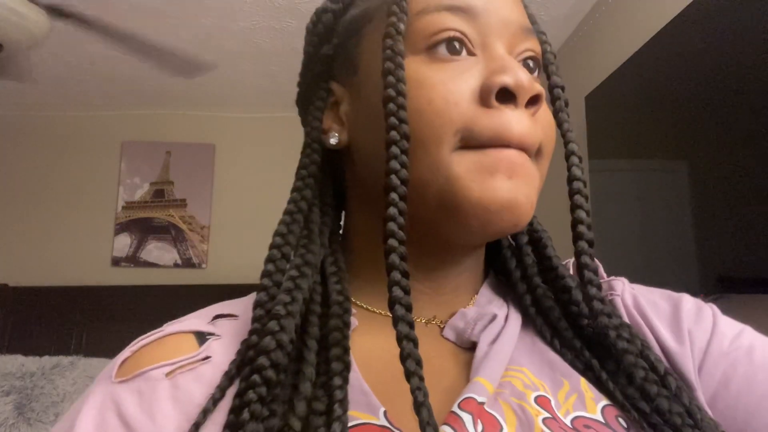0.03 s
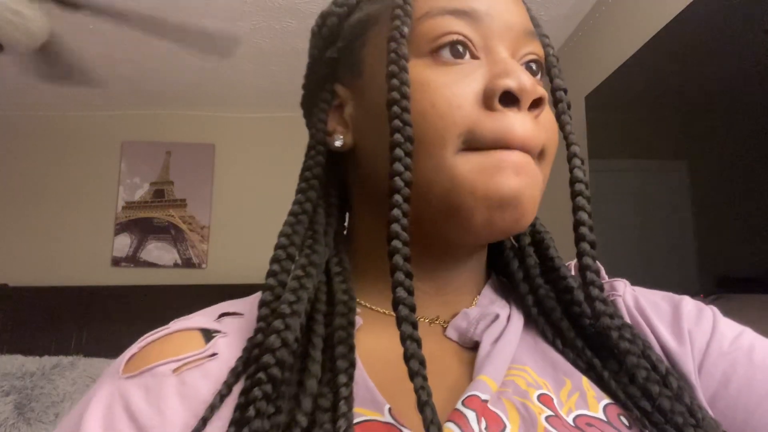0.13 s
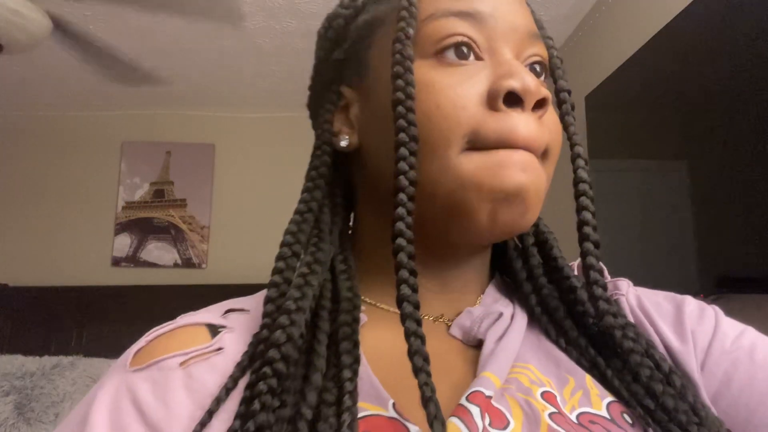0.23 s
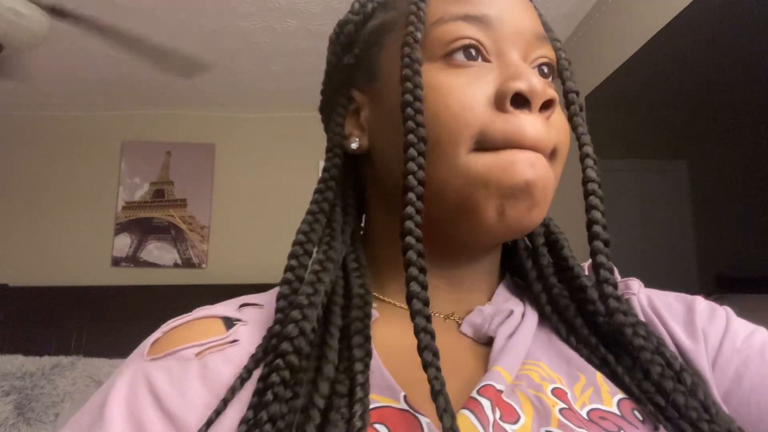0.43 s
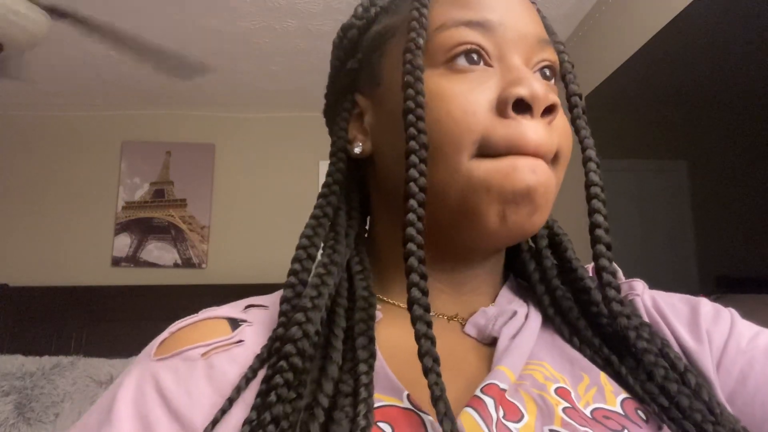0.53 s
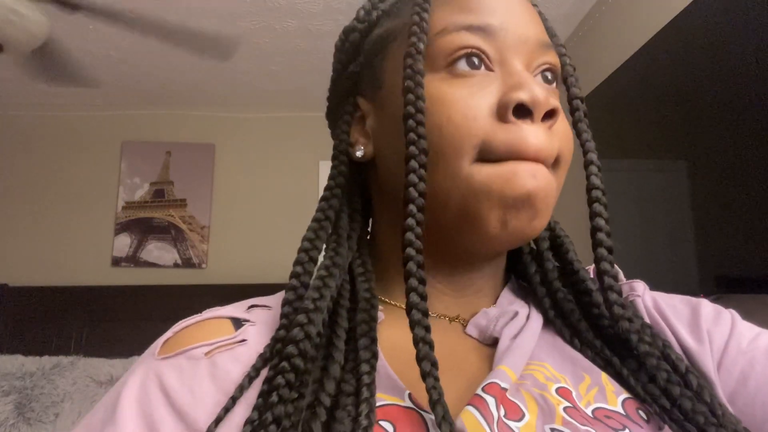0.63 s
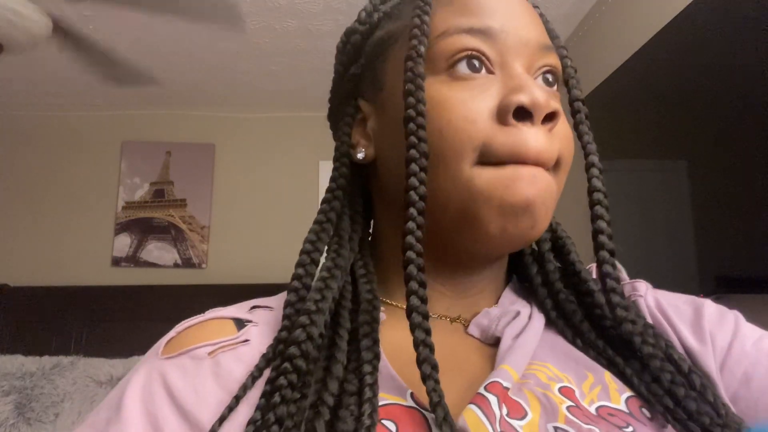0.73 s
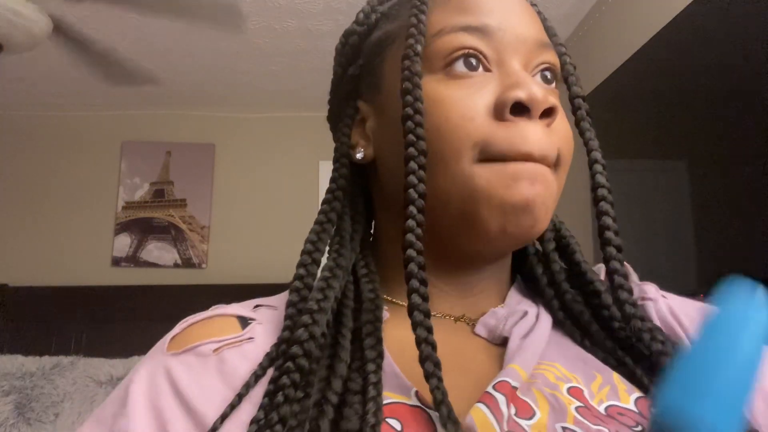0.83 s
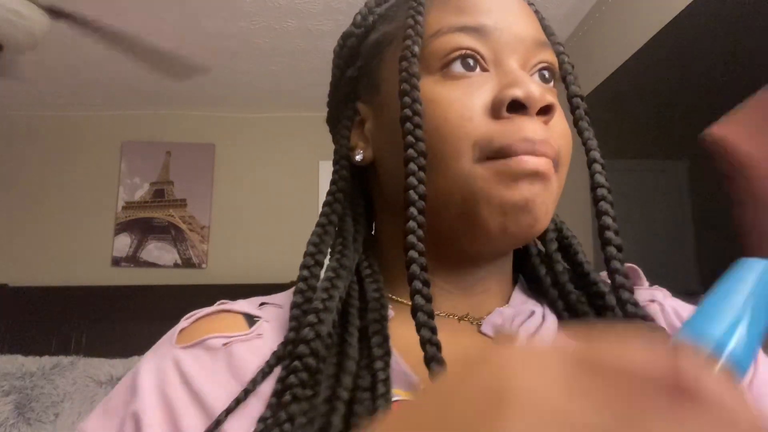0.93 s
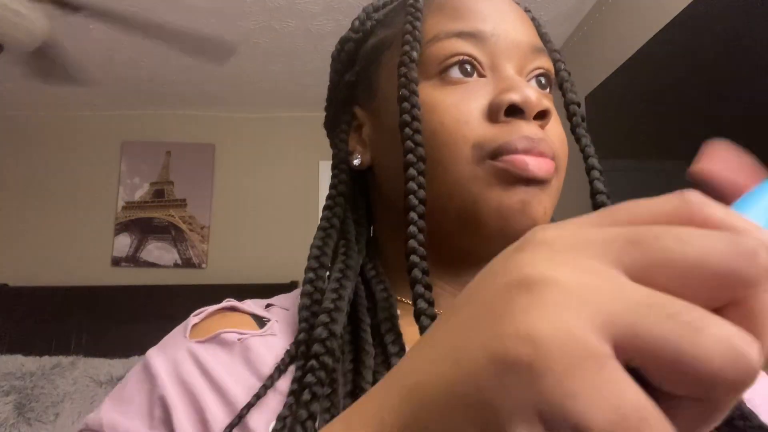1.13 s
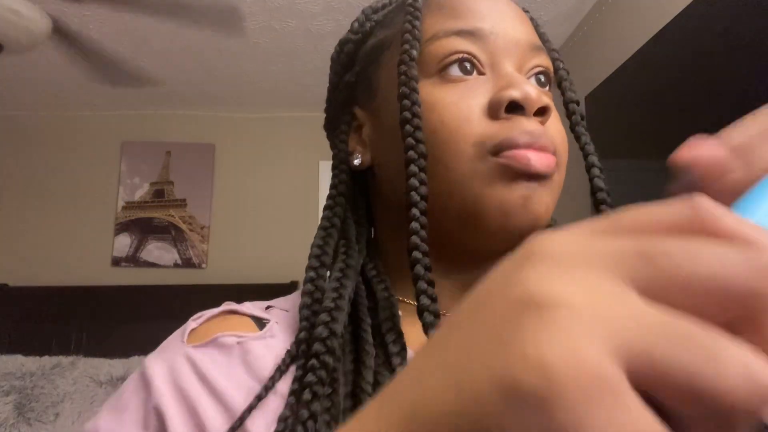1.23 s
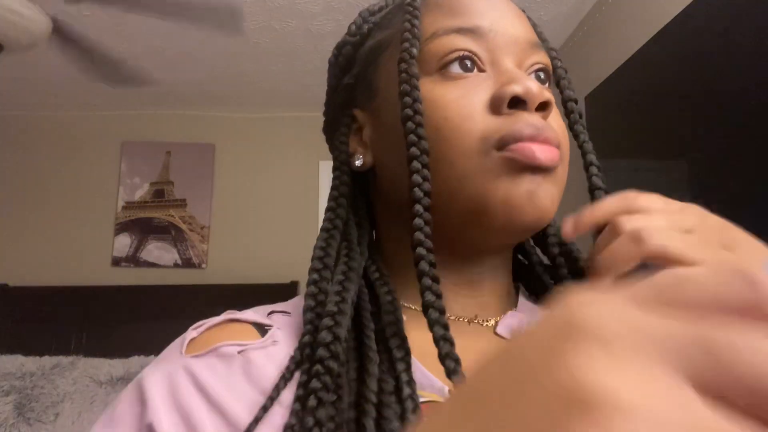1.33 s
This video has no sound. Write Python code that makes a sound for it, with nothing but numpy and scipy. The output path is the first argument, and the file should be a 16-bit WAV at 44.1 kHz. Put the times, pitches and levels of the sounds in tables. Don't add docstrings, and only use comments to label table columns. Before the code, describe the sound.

A small hard plastic tube knocks twice on a hollow desk with a tiny bounce between, each crack followed by woody body and low boom; then faint finger ticks and rubs, close microphone, quiet humming bedroom.

```python
import sys
import numpy as np
from scipy import signal
from scipy.fft import rfft, irfft, next_fast_len
from scipy.io import wavfile
from scipy.ndimage import uniform_filter1d, map_coordinates

SR = 44100
rng = np.random.default_rng(int(sys.argv[2]) if len(sys.argv) > 2 else 0)


def makeup_ratio(level_db):
    decades = np.asarray(level_db, float) / 20
    return 10 ** decades


def to_wav(sig):
    pcm = np.clip(np.atleast_2d(sig), -1, 1) * 32767
    pcm = np.round(pcm).astype(np.int16)
    wavfile.write(sys.argv[1], SR, pcm.T)


N = 61739


def unit(x):
    return x / np.sqrt(np.mean(x ** 2) + 1e-20)


def along(points, hz):
    point_hz, value = np.transpose(points)
    return np.interp(np.log(hz + 1), np.log(point_hz + 1), value)


def curve(rows):
    return np.interp(np.arange(N) / SR, *np.transpose(rows))


def wobble(knots_per_s):
    knots = rng.standard_normal(int(N * knots_per_s / SR) + 4)
    return map_coordinates(knots, [np.arange(N) * knots_per_s / SR])


def filtered(x, response):
    n = x.shape[-1]
    size = next_fast_len(n + 8192)
    spectrum = rfft(x, size) * response(np.fft.rfftfreq(size, 1 / SR))
    return irfft(spectrum, size)[..., :n]


def add(track, start_s, sound):
    part = track[round(start_s * SR):][:len(sound)]
    part += sound[:len(part)]


def ring(modes, rise_s, scatter_db, rough_rad):
    t = np.arange(SR // 2) / SR
    out = np.zeros(len(t))
    for k, (freq_hz, level_db, t60_s) in enumerate(modes):
        envelope = makeup_ratio(level_db + scatter_db * rng.standard_normal() - 60 * t / t60_s)
        jitter = rough_rad * wobble(128)[:len(t)] * np.minimum(t / 0.012, 1)
        out += (-1) ** k * envelope * np.sin(2 * np.pi * freq_hz * t + jitter)
    return out * (1 - np.exp(-(t / rise_s) ** 2))


def burst(colour, rise_s, t60_s):
    t = np.arange(SR // 10) / SR
    noise = unit(filtered(rng.standard_normal(len(t)), colour))
    return noise * (1 - np.exp(-(t / rise_s) ** 2)) * makeup_ratio(-60 * t / t60_s)


def rush(spectrum, alike, patchy_db):
    z = signal.stft(rng.standard_normal((2, N)), nperseg=512)[2]
    patches = uniform_filter1d(rng.standard_normal(z.shape[1:]), size=6, axis=0)
    patches = uniform_filter1d(patches, size=10, axis=1)
    pair = signal.istft(z * makeup_ratio(patchy_db * unit(patches)), nperseg=512)[1][:, :N]

    def mid_side(hz):
        turn = np.arccos(np.clip(along(alike, hz), -1, 1)) / 2
        return makeup_ratio(along(spectrum, hz)) * [np.cos(turn), np.sin(turn)]

    mid, side = filtered(pair, mid_side)
    return unit(np.array([mid + side, mid - side]))


# freq_hz, level_db
HUM_SPECTRUM = [(20, -37.5), (33, -15), (45, -2.5), (70, -5.5), (107, 3), (129, -1), (145, -12.5),
                (194, -10.5), (330, -15.5), (430, -57)]
# freq_hz, level_db
AIR_SPECTRUM = [(150, -42), (250, -15.5), (457, -1), (600, -10.5), (1100, -14), (1500, -27.5), (4500, -41),
                (9400, -46.5), (10000, -69)]
# time_s, level_db
AIR_STIR = [(0, -5), (.15, 0), (.5, -1), (.9, 1), (1.1, -2), (1.27, -1.5), (1.33, 4.5), (1.4, -3)]
# freq_hz, level_db
HISS_SPECTRUM = [(10600, -37), (11200, -4), (13600, 8), (14200, -35)]
# freq_hz, correlation
LIKENESS = [(60, 0.85), (180, 0.74), (550, -0.39), (1650, -0.17), (4970, 0.27), (15000, -1.6)]


def background():
    hum_db, air_db, hiss_db = -52.5, -63.5, -98
    hum = makeup_ratio(hum_db + 0.41 * wobble(6.5)) * rush(HUM_SPECTRUM, LIKENESS, patchy_db=0.77)
    air = makeup_ratio(air_db + curve(AIR_STIR)) * rush(AIR_SPECTRUM, LIKENESS, patchy_db=1.0)
    hiss_band = [(9000, -120)] + HISS_SPECTRUM + [(16000, -120)]
    hiss = makeup_ratio(hiss_db) * rush(hiss_band, [(3000, 0.2)], patchy_db=3.2)
    return (hum + air + hiss) * makeup_ratio([[-1.2], [1.2]])


# freq_hz, t60_s
ROOM_DECAY = [(150, 0.3), (500, 0.18), (2000, 0.3), (5000, 0.22), (12000, 0.13)]
# freq_hz, level_db
ROOM_TINT = [(100, -13.5), (600, 0), (1500, 4.5), (3000, 0), (6000, -5), (12000, 1)]


def room(x):
    out = np.zeros((2, N))
    stretch = SR // 11
    for start in range(0, N, stretch):
        hz, t, z = signal.stft(rng.standard_normal((2, SR // 2)), SR, nperseg=256)
        decay_db = along(ROOM_TINT, hz)[:, None] - 60 * t / along(ROOM_DECAY, hz)[:, None]
        tail = signal.istft(z * makeup_ratio(decay_db), SR, nperseg=256)[1]
        tail = tail / np.linalg.norm(tail[0])
        wet = signal.fftconvolve(x[None, start:start + stretch], tail, axes=1)
        for c in range(2):
            add(out[c], start / SR + 0.004, wet[c])
    return out


# freq_hz, left_minus_right_db
PORT_TILT = [(60, -1), (130, -8.5), (290, 5), (640, -11.5), (1410, -2), (3100, -5.5), (6820, -5),
             (15000, 3.5)]
# freq_hz, left_lead_rad
PORT_LEAD = [(0, 0), (140, -1), (300, -1.82), (600, -1.5), (1120, -2.5), (1720, 0.5), (3360, -11.5),
             (4220, -5), (6500, -3.5), (7670, -11), (12400, -18.5), (15200, -16)]


def ports(x):
    side = np.array([[0.5], [-0.5]])

    def response(hz):
        lead_rad = np.interp(hz, *np.transpose(PORT_LEAD))
        return makeup_ratio(side * along(PORT_TILT, hz)) * np.exp(1j * side * lead_rad)

    return filtered(x, response)


# time_s, level_db
SLIDE_DRAG = [(.5, -86), (.62, -92), (.72, -83.5), (.76, -81.5), (.93, -70), (.98, -88)]
# freq_hz, width_hz, level_db
SLIDE_RESONANCES = [(2620, 390, 0), (1860, 2600, 4), (4660, 620, -6)]


def finger_slide():
    def tube(hz):
        total = 0
        for peak_hz, width_hz, level_db in SLIDE_RESONANCES:
            damping = 1j * hz * width_hz
            total = total + makeup_ratio(level_db) * damping / (peak_hz ** 2 - hz ** 2 + damping)
        return total ** 2

    silent_until_s = SLIDE_DRAG[0][0] - 0.1
    drag_db = curve([(0, -120), (silent_until_s, -120)] + SLIDE_DRAG + [(1.1, -120)])
    return unit(filtered(rng.standard_normal(N), tube)) * makeup_ratio(drag_db)


# freq_hz, level_db
SKIN_COLOUR = [(900, -36), (2000, -9), (7300, -6.5), (9400, -8), (10000, -26), (10900, -35), (11400, -11),
               (13600, -19), (14400, -25), (15600, -35)]
# time_s, level_db
RUB_PRESSURE = [(0, -98), (.18, -83), (.3, -93), (.55, -88), (.62, -81.5), (.7, -87), (.78, -84),
                (.85, -86), (.94, -83), (.99, -69), (1.025, -72), (1.07, -76), (1.12, -85), (1.25, -83),
                (1.4, -87.5)]


def finger_rub():
    return rush(SKIN_COLOUR, [(3000, 0.3)], patchy_db=2.5) * makeup_ratio(curve(RUB_PRESSURE) + 0.41 * wobble(140))


# start_s, level_db, brightness_db_per_octave
FINGER_TICKS = [(.616, -57, -8.5), (0.664, -65, -6), (0.7123, -57, -9.5), (0.9612, -56.5, -5.5),
                (0.9889, -52, 5), (1.017, -55, 18), (1.034, -62, 9), (1.25, -64, 8), (1.316, -77, -6)]


def finger_ticks():
    out = np.zeros(N)
    for start_s, level_db, bright_db in FINGER_TICKS:
        def colour(hz):
            return makeup_ratio(along(SKIN_COLOUR, hz) + bright_db * np.log2(hz / 5000 + 0.0058))
        add(out, start_s, makeup_ratio(level_db) * burst(colour, rise_s=0.00066, t60_s=0.013))
    return out


# start_s, level_db, pitch_hz, t60_s
HAND_PUSHES = [(.148, -38.5, 170, 0.16), (.272, -36.5, 90, 0.39), (0.23, -44, 53, 0.23),
               (0.34, -52.5, 230, .12), (.325, -47, 186, 0.13), (0.15, -60, 960, 0.24)]


def hand_pushes():
    out = np.zeros(N)
    for start_s, level_db, pitch_hz, t60_s in HAND_PUSHES:
        add(out, start_s, ring([(pitch_hz, level_db, t60_s)], 0.0088, scatter_db=1.5, rough_rad=0.15))
    return out


# start_s, crack_db, body_db, ring_db, desk_db
KNOCK_EVENTS = [
    (0.2055, -26, -23.5, -41, -26.5),
    (0.2881, -39, -57.5, -55.5, -79),
    (0.3895, -27.5, -24.5, -42.5, -31.5),
]
# first_body_mode_db, fifth_body_mode_db
KNOCK_BODY_TILT = [(-1.5, 4), (-7, 30.5), (-0.5, 4)]
# freq_hz, level_db
CRACK_COLOUR = [(600, -17), (1200, -13), (2200, -5.5), (3200, -9), (5000, -6.5), (8500, -11),
                (10500, -38.5), (12000, -20.5), (13500, -28), (14800, -40), (15600, -49)]
# freq_hz, level_db, t60_s
TUBE_MODES = [(2040, 4, 0.018), (2470, -7, 0.023), (3660, -33, 0.077), (4260, -1.5, 0.035),
              (4700, -25, 0.018), (6630, 3, 0.041), (7570, -10, 0.045), (8350, -26, 0.069),
              (14700, -40, 0.045)]
SING_MODE_HZ = [2790, 5445, 8400, 12050, 14530]
# level_db, t60_s
SING_MODE_DECAY = [(5.5, 0.043), (2.5, 0.12), (-20.5, 0.23), (-30, 0.056), (-16, .17)]
# freq_hz, level_db, t60_s
BODY_MODES = [(543, -2.5, 0.11), (647.7, -3.5, 0.076), (792.4, -5.5, 0.059), (947, -19.5, 0.043),
              (1109, -10, 0.038), (1397, -17.5, 0.057), (295.7, -22, 0.19), (372, -28, 0.19),
              (689, -7.5, 0.063)]
# freq_hz, level_db, t60_s
DESK_MODES = [(142.5, 5.5, 0.091), (192.6, -13.5, 0.23), (94, -1, 0.033)]


def knocks():
    scrape_lead_s, scrape_db = 0.014, -34
    body_lag_s, desk_lag_s = 0.0012, 0.0082
    sing_modes = [(hz, *decay) for hz, decay in zip(SING_MODE_HZ, SING_MODE_DECAY)]

    def crack_colour(hz):
        return makeup_ratio(along(CRACK_COLOUR, hz))

    out = np.zeros(N)
    for event, (first_db, fifth_db) in zip(KNOCK_EVENTS, KNOCK_BODY_TILT):
        start_s, crack_db, body_db, ring_db, desk_db = event
        tilt_db = {0: first_db, 4: fifth_db}
        body_modes = [(hz, db + tilt_db.get(k, 0), t60_s) for k, (hz, db, t60_s) in enumerate(BODY_MODES)]

        scrape = burst(crack_colour, rise_s=0.0014, t60_s=0.46)
        crack = burst(crack_colour, rise_s=0.0013, t60_s=0.025)
        tube = ring(TUBE_MODES, 0.0015, scatter_db=2, rough_rad=0.6)
        sing = ring(sing_modes, 0.0013, scatter_db=-1.2, rough_rad=0.55)
        body = ring(body_modes, 0.0015, scatter_db=1.2, rough_rad=0.42)
        desk = ring(DESK_MODES, 0.004, scatter_db=2.5, rough_rad=0.06)

        add(out, start_s - scrape_lead_s, makeup_ratio(crack_db + scrape_db) * scrape)
        add(out, start_s, makeup_ratio(crack_db) * crack)
        add(out, start_s, makeup_ratio(ring_db) * (tube + sing))
        add(out, start_s + body_lag_s, makeup_ratio(body_db) * body)
        add(out, start_s + desk_lag_s, makeup_ratio(desk_db) * desk)
    return out


def scene():
    room_db = -9.5
    near = finger_slide() + finger_ticks() + hand_pushes() + knocks()
    return ports(near) + makeup_ratio(room_db) * room(near) + finger_rub() + background()


def top_cut(x):
    return signal.sosfilt(signal.butter(12, 15640, fs=SR, output="sos"), x)


def record(dry):
    top_hz = 15640
    mix = filtered(dry, lambda hz: hz < top_hz)
    return top_cut(mix)


dry = scene()
out = record(dry)
to_wav(out)
```